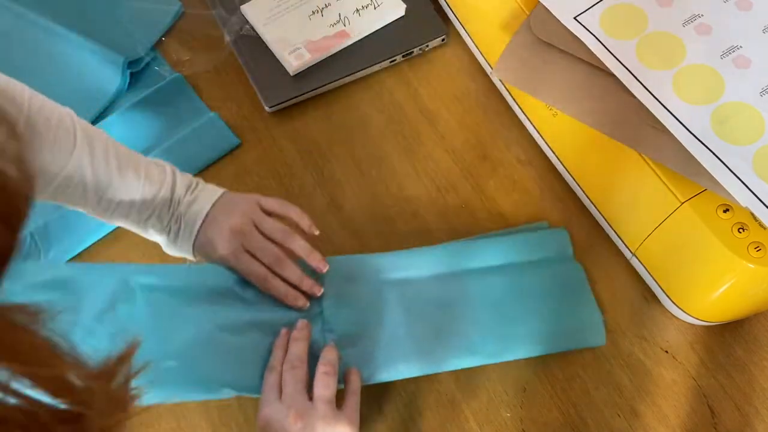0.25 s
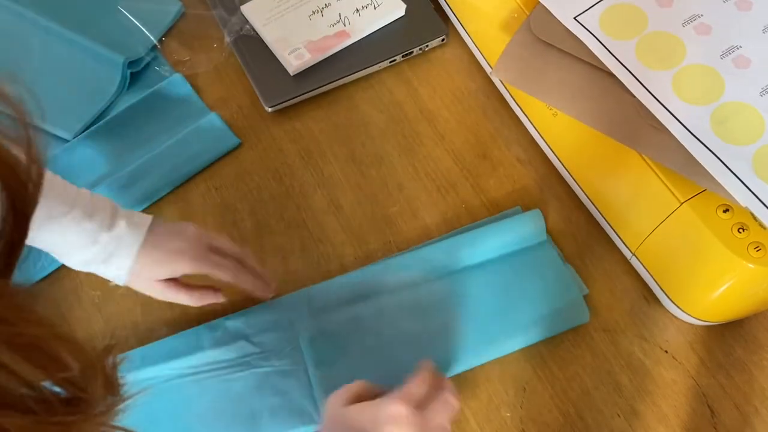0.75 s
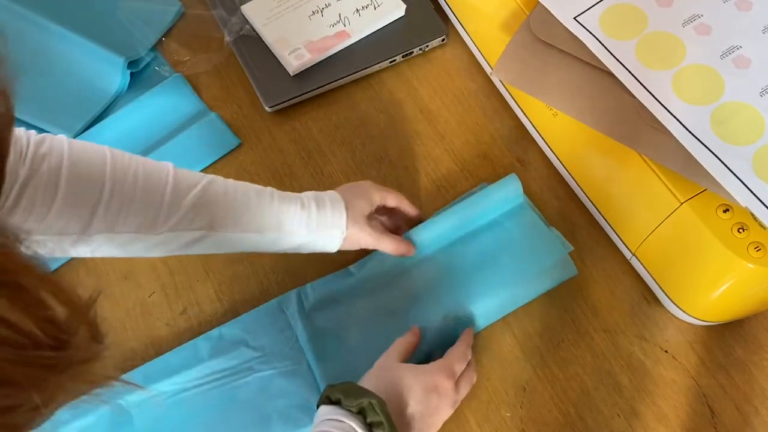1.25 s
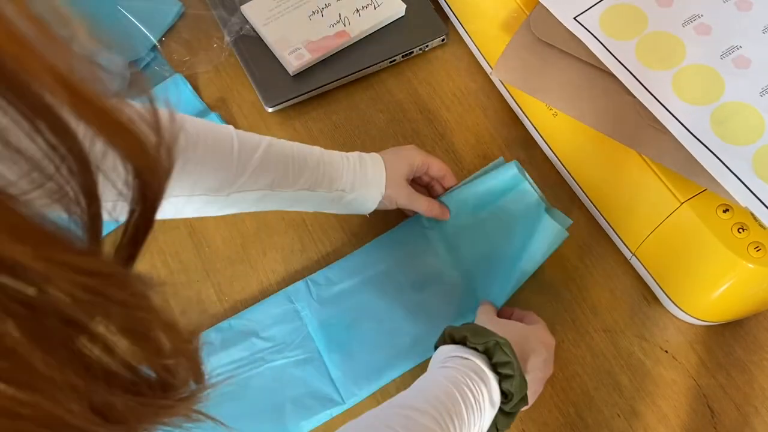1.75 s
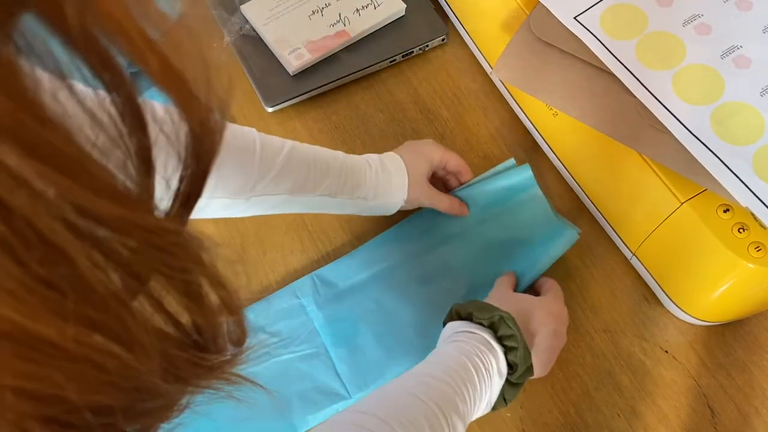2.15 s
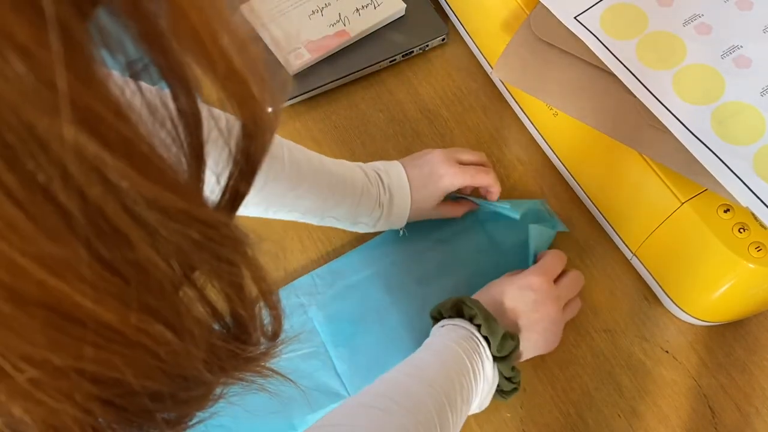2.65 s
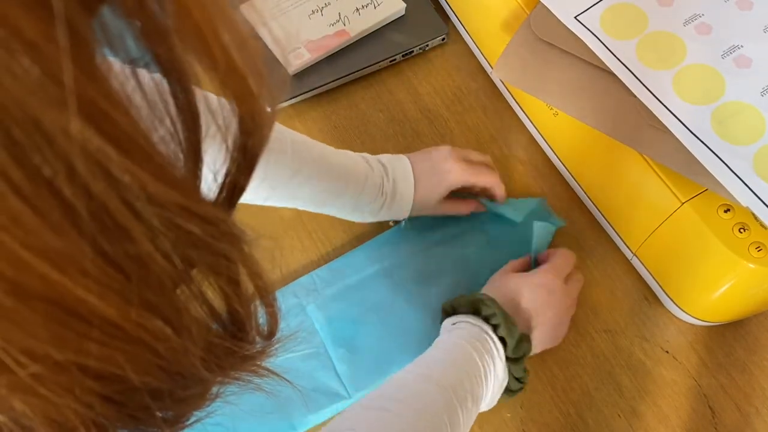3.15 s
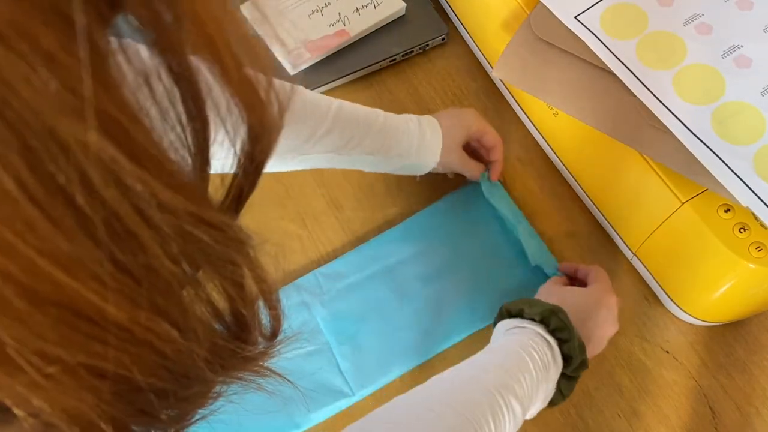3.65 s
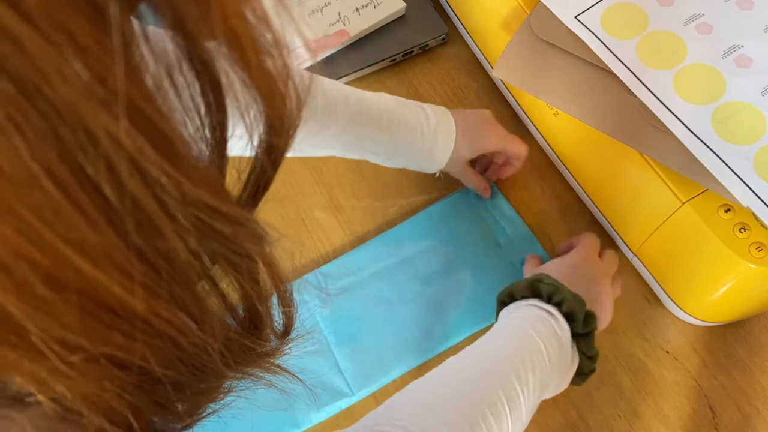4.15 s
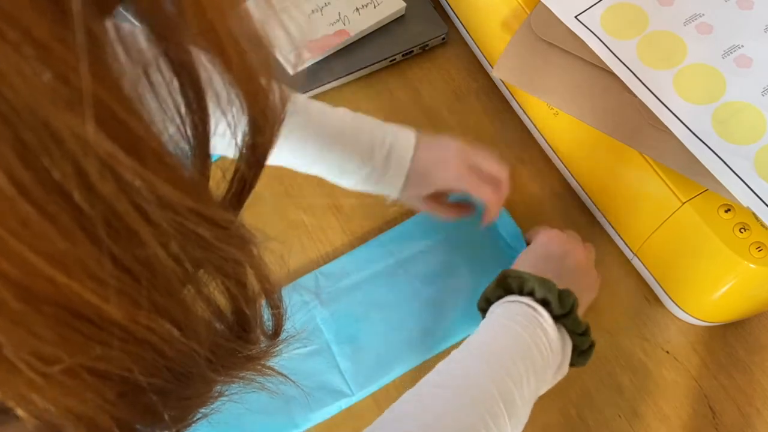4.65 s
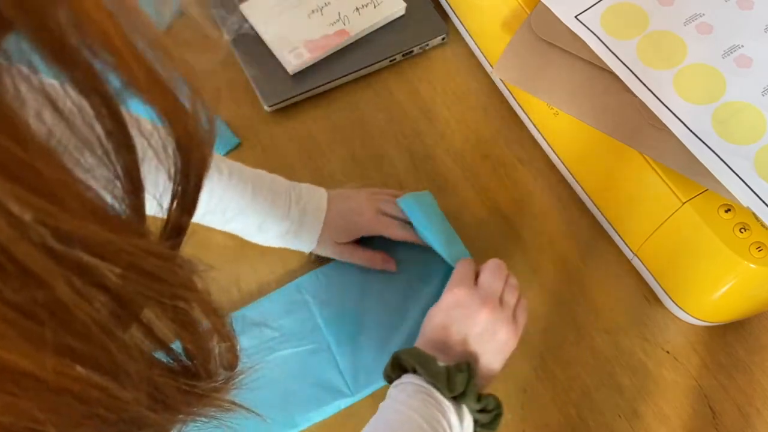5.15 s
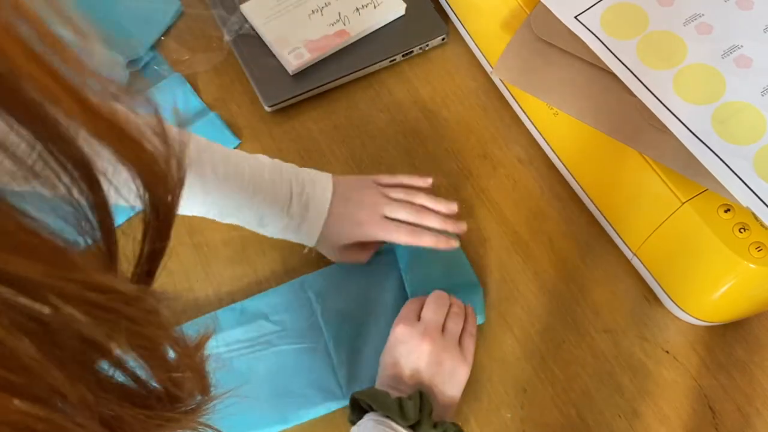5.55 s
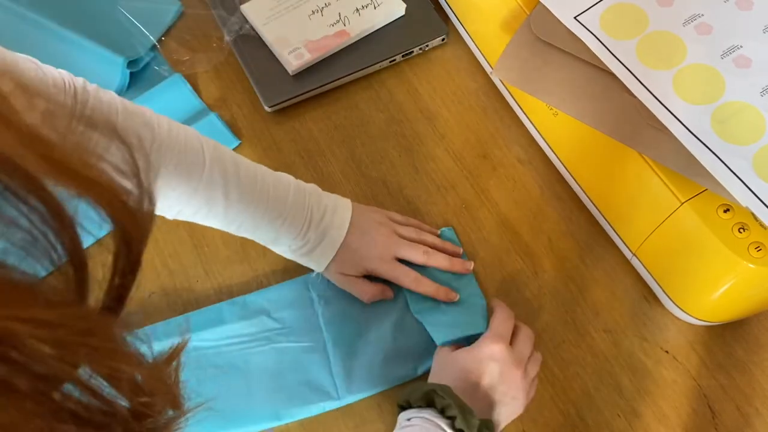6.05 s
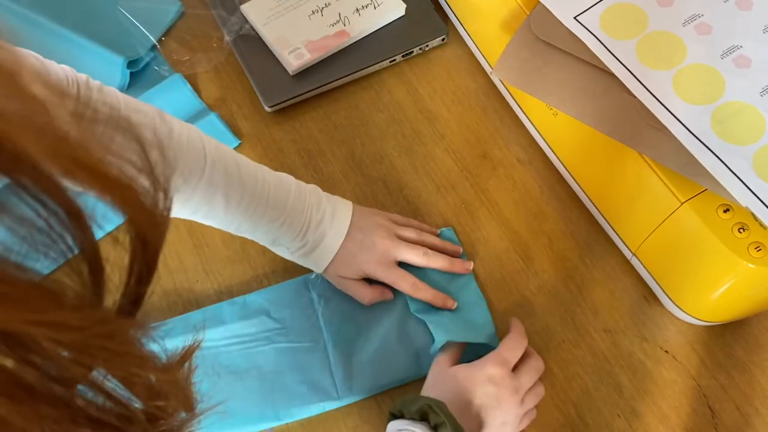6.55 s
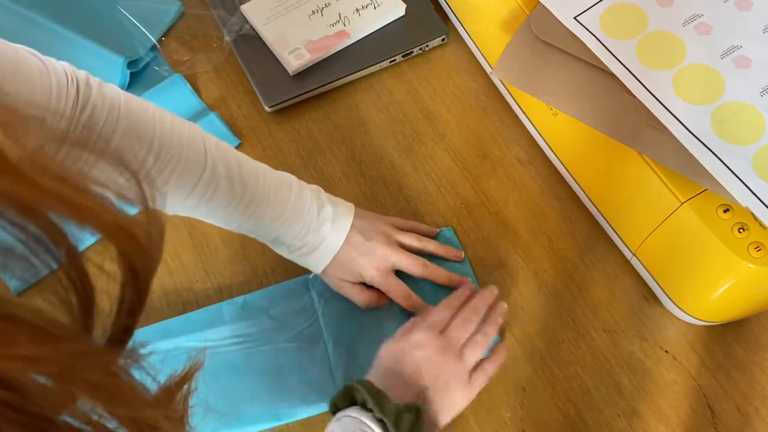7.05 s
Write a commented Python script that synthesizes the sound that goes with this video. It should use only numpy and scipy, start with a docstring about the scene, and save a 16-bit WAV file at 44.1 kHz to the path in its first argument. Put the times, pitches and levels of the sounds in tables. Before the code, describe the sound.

Tissue paper is smoothed and folded by hand on a wooden table, close to the microphone in a small room. It rustles and crackles from the start, and between 0.2 and 0.6 seconds a cluster of low thumps lands on the tabletop, with the rub and rumble of forearms. Uneven bursts of sliding hiss and crinkling follow until about 2.5 seconds, with sharp crease snaps around 1.5. The handling turns lighter, with scattered ticks, a brief lull just before 4 seconds and then a soft bump. Crisp snaps stand out at 4.3 and 4.8 seconds, the second amid stronger rustling and a couple of dull bumps. Gentler, steadier rustling runs from about 5 to 6 seconds, then short crinkly strokes lead to a low thump and a last rustle near 7.1 seconds. A faint, steady low room tone lies underneath.

```python
"""Tissue paper, a long sheet, folded by hand on a wooden table close under a two-port microphone.
The sheet hisses as it slides, crinkles in clumps of tiny buckles and snaps at creases; taut facets ping.
Hands and the bundle land on the table top, whose modes answer with low thumps; shifting forearms and
hands rub and rumble on the wood. A small room adds a short tail and a faint steady tone."""
import sys
import numpy as np
from scipy import signal
from scipy.fft import rfft, irfft
from scipy.io import wavfile

SR = 44100
rng = np.random.default_rng(int(sys.argv[2]) if len(sys.argv) > 2 else 0)


def store_pcm(level_fs):
    """Save levels as 16-bit WAV."""
    pcm = np.round(np.clip(level_fs, -1, 1) * 32767).astype(np.int16)
    wavfile.write(sys.argv[1], SR, np.atleast_2d(pcm).T)


N = 321048
BIN_HZ = np.maximum(np.fft.rfftfreq(N, 1 / SR), 1)

# hand moves on the sheet: t/s, length/s, rustle level/dB, sheet body re rustle/dB
MOVES = [(0.0, 0.04, -47, -2.5), (0.09, 0.063, -45, -4), (0.206, 0.028, -38.5, -3.5), (0.294, 0.2, -44, 4),
         (0.527, 0.042, -41, 1.5), (0.688, 0.0083, -63.5, -7), (0.774, 0.013, -71.5, 13),
         (0.859, 0.064, -45.5, -5), (0.968, 0.031, -37.5, -16), (1.06, 0.13, -54.5, -9),
         (1.117, 0.12, -44, -13.5), (1.302, 0.094, -45, -11), (1.392, 0.12, -41, -13),
         (1.572, 0.18, -46.5, -13.5), (1.79, 0.077, -54, -4.5), (1.873, 0.088, -45.5, -12),
         (1.964, 0.1, -54, -6.5), (2.108, 0.17, -46.5, -11), (2.332, 0.13, -47.5, -6),
         (2.516, .1, -55, -3.5), (2.674, 0.057, -62.5, 1), (2.766, 0.032, -54.5, -2),
         (2.854, 0.033, -51.5, -0.5), (2.961, 0.22, -51, -7.5), (3.202, 0.18, -49.5, -20),
         (3.412, 0.08, -53, -14), (3.525, 0.038, -42.5, -11.5), (3.636, 0.023, -58, 1),
         (3.721, 0.11, -50, -27), (4.026, 0.085, -56.5, -8.5), (4.188, 0.13, -54, -5),
         (4.352, 0.11, -49, -9.5), (4.418, 0.098, -50, -9.5), (4.603, .06, -49.5, -14),
         (4.737, 0.076, -50, -2), (4.788, 0.075, -40, -12), (4.91, 0.14, -49, -11),
         (5.021, 0.076, -45.5, -2.5), (5.142, 0.056, -52, -1), (5.244, 0.29, -49.5, -4),
         (5.538, 0.27, -50, -7.5), (5.866, 0.32, -50, -8.5), (6.104, 0.11, -42.5, -4.5),
         (6.406, 0.025, -44, -6.5), (6.464, 0.041, -51, -14), (6.527, 0.047, -43.5, -5),
         (6.662, 0.11, -41.5, -11), (6.926, 0.029, -54, -19), (7.022, .04, -55.5, -9),
         (7.079, 0.046, -44, -3.5), (7.152, .12, -51, -14)]
# rustle colour: t/s, crisp treble re rustle/dB, favoured f/Hz
RUSTLE_COLOUR = [(0, -1.5, 4400), (.3, -7.5, 2680), (.9, -7, 3580), (1.5, -5.5, 4630), (2.3, -6, 4200),
                 (3.0, -6, 4000), (3.75, -6.5, 6130), (4.6, -5.5, 6400), (5.4, -3.5, 3950),
                 (5.9, -6.5, 4500), (6.15, -5, 3600), (6.4, -10.5, 4480), (6.75, -8, 4460),
                 (7.28, -7, 3570)]
# weight on the table: t/s, rumble level/dB, rub level/dB
LEANING = [(0.0, -57, -53), (0.28, -73, -62), (0.4, -49, -47), (0.55, -39.5, -52.5), (0.93, -58.5, -60.5),
           (1.19, -62.5, -67), (1.36, -51.5, -64), (1.66, -57, -57.5), (1.84, -62, -68.5), (2.08, -61, -60),
           (2.21, -60, -52.5), (2.66, -71, -83), (3.36, -70.5, -79), (4.3, -54.5, -64), (4.7, -64.5, -72),
           (4.91, -53, -65), (5.3, -67, -65), (6.12, -58, -67.5), (7.28, -71, -80)]
# creases snapping: t/s, level/dB, centre f/Hz
SNAPS = [(0.018, -33, 3730), (0.1022, -24, 5300), (0.2143, -24, 2680), (0.2907, -22.5, 2210),
         (0.3515, -21.5, 6690), (0.395, -24, 1690), (0.414, -19.5, 1540), (0.462, -19, 1770),
         (0.5475, -16.5, 4520), (0.829, -31, 3740), (0.8428, -22, 3900), (0.8674, -22.5, 2750),
         (1.0465, -24.5, 4570), (1.3047, -26, 7420), (1.4112, -20.5, 7010), (1.4681, -16.5, 4430),
         (1.5469, -18, 6990), (1.5869, -22.5, 11000), (1.876, -24.5, 6500), (2.1116, -25, 4730),
         (2.175, -23, 6720), (2.5376, -29, 10900), (2.6804, -28.5, 6060), (2.883, -35, 5550),
         (3.1439, -28, 3450), (3.361, -25.5, 3760), (3.4999, -31, 7320), (3.5124, -26.5, 4340),
         (3.6378, -29.5, 2820), (3.741, -26, 7280), (3.7663, -23.5, 5900), (3.7994, -26.5, 5650),
         (3.916, -43, 6490), (3.9578, -39, 7270), (4.0055, -27.5, 4860), (4.0466, -30.5, 6600),
         (4.2011, -25.5, 7350), (4.289, -16.5, 7000), (4.7159, -22.5, 4920), (4.753, -23, 7280),
         (4.783, -14, 6660), (4.863, -23, 4090), (4.9035, -26.5, 6100), (5.2628, -25, 5200),
         (5.4103, -35, 3370), (5.8457, -29, 6870), (6.038, -26.5, 7350), (6.1363, -23, 4150),
         (6.3834, -27, 4090), (6.4006, -21, 3780), (6.6732, -27, 4440), (6.7503, -23, 4450),
         (6.7725, -41, 5010), (6.923, -32, 3450), (7.0544, -25, 4580), (7.0805, -22, 2710)]
# table contacts: t/s, level/dB, offsets/dB for modes at 105-200 Hz, 200-720 Hz, above 720 Hz
THUMPS = [(0.233, -21.5, -3, -6.5, 2.5), (0.26, -33, 6, -7, -19), (0.29, -19.5, -9.5, -11, -4),
          (0.323, -26.5, -33, -6.5, 2), (0.354, -17.5, -10, -16.5, -12), (0.403, -22, -19, -35, -32),
          (0.469, -32.5, 0, -2, -4), (0.487, -39, -2, 5, -38), (0.524, -34.5, 3.5, 4, -14),
          (0.553, -17.5, -5.5, 0, -4), (0.567, -26, -5, 2.5, -21), (0.59, -28, -6, 1.5, -23),
          (0.768, -42, -14, -8, -10), (0.794, -43, -2, -7, -12), (1.141, -45.5, -0.5, -13, -11),
          (1.327, -44, 0.5, -14, -16), (1.399, -40.5, -4, -17, -10), (1.67, -50, -4, -2, -4),
          (3.531, -50.5, 2, -5.5, 10.5), (3.799, -45.5, -1, -7, -26), (4.008, -27.5, -6, -13, -14.5),
          (4.2, -47, -9, 2.5, -4), (4.278, -39.5, -20, -13, -13), (4.406, -48, 7, -1.5, 4),
          (4.72, -29, -10.5, -23, -23), (4.784, -36, -5, -7.5, -8), (4.866, -28.5, -12, -13, -12),
          (5.462, -45, -2.5, -25, 2), (5.519, -35.5, -13, -28, -27), (5.689, -43.5, -8, -26, -19),
          (5.953, -57.5, 7, 3, -4), (6.372, -56, -3, 5.5, -1), (6.773, -38.5, -7.5, -20, -16),
          (7.092, -23.5, -14.5, -16.5, -30), (7.195, -43, -11, -17, -22), (7.254, -38.5, -9, -17, -16)]
# table-top modes: f/Hz, level/dB, t60/s
TABLE_MODES = [(68.8, -2.5, 0.44), (85.1, 3, 0.12), (124.2, 7, 0.29), (177.3, -3.5, 0.16),
               (261.5, 5, 0.083), (334, -0.5, 0.21), (413, -1.5, 0.13), (492, -3, 0.082), (586, -3, 0.068),
               (722, -7, 0.083), (819, -4, 0.1), (976, -2.5, 0.078), (1116, -10.5, 0.062), (1400, -4, 0.04),
               (1950, -11, 0.02)]
# noise spectra of paper, wood and room: f/Hz, level/dB
RUSTLE_SPECTRUM = [(700, -24), (1400, -6), (2200, -1), (3200, 0.5), (5000, 0), (6500, -2), (8000, -0.5),
                   (11000, -31.5)]
BODY_SPECTRUM = [(500, -1), (800, -4.5), (1100, 1), (1600, -3.5), (2400, -10.5), (4000, -57)]
CRISP_SPECTRUM = [(4500, -11), (7000, -8), (8500, -5.5), (11000, -3.5), (13500, -5), (16000, -6.5)]
RUB_SPECTRUM = [(130, -14), (250, 5), (420, 2.5), (600, 0.5), (900, -52.5)]
RUMBLE_SPECTRUM = [(25, -10.5), (48, -4), (66, -2), (92, -3), (124, -1.5), (160, -11), (260, -7),
                   (500, -73)]
ROOM_SPECTRUM = [(30, 13), (60, 21.5), (130, -1.5), (300, 6), (1000, -1), (4000, -85.5), (16000, -51)]
# left-right coherence of the sound field: f/Hz, coherence/0-1
COHERENCE = [(60, 0.99), (200, 0.92), (400, 0.8), (750, .15), (1100, 0.5), (1500, 0.26), (2000, 0.5),
             (2800, 0.86), (4200, 0.87), (5500, 0.4), (6800, 1), (8000, 1)]
# port imbalance: f/Hz, left minus right/dB
PORT_BALANCE = [(70, 0.5), (130, -3), (220, 2), (1500, 0), (2200, 3), (4000, 0.5), (5300, 4.5), (6800, 0)]


def from_db(db):
    """dB to gain."""
    return 10 ** (np.asarray(db) / 20)


def unit_rms(x):
    """Scale to rms 1."""
    return x / np.sqrt(np.mean(x ** 2) + 1e-20)


def in_time(rows):
    """Curve columns at every sample."""
    times_s, *columns = np.transpose(rows)
    return [np.interp(np.arange(N) / SR, times_s, column) for column in columns]


def at_hz(points, hz):
    """Interpolate over log frequency."""
    points_hz, values = np.transpose(points)
    return np.interp(np.log(hz), np.log(points_hz), values)


def drift(rate_hz):
    """Slow random wander, rms 1."""
    r = np.exp(-2 * np.pi * rate_hz / SR)
    return unit_rms(signal.lfilter([1], [1, -2 * r, r * r], rng.standard_normal(N + SR))[SR:])


def field(pair, spectrum):
    """Two independent signals to coloured left and right with the field's coherence."""
    mid, side = rfft(pair) * from_db(at_hz(spectrum, BIN_HZ))
    coherence = at_hz(COHERENCE, BIN_HZ)
    return irfft(np.sqrt(1 + coherence) * mid + np.sqrt(1 - coherence) * side * [[1], [-1]], N)


def ring(clicks, hz, t60_s):
    """One mode: each click starts a decaying sine."""
    r, w = from_db(-60 / (t60_s * SR)), 2 * np.pi * hz / SR
    return signal.lfilter([0, np.sin(w)], [1, -2 * r * np.cos(w), r * r], clicks)


def hand_moves(rise_db_per_s=442, sag_db_per_s=1.5, fall_db_per_s=285, rest_db=-79):
    """Rustle and body curves, dB: moves rise, sag, die away and add in power over the settling sheet."""
    t = np.arange(0, N + 64, 64) / SR
    start_s, length_s, level_db, body_db = np.transpose(MOVES)[:, :, None]
    age_s = t - start_s
    db = level_db + rise_db_per_s * np.minimum(age_s, 0)
    db -= sag_db_per_s * np.clip(age_s, 0, length_s)
    db -= fall_db_per_s * np.maximum(age_s - length_s, 0)
    power = from_db(2 * np.maximum(db, -200))
    total = power.sum(axis=0) + from_db(2 * rest_db)
    mean_body_db = (power * body_db).sum(axis=0) / total
    return in_time(np.transpose([t, 10 * np.log10(total), mean_body_db]))


def crinkle(per_s, spread_db, decay_s, clump_db, slide):
    """Envelope of uneven buckles in random clumps, over steady sliding."""
    sizes = from_db(spread_db * np.minimum(rng.exponential(1, N), 4))
    buckles = rng.random(N) < per_s * from_db(clump_db * drift(30)) / SR
    r = np.exp(-1 / (decay_s * SR))
    decay_and_rise = np.convolve([1, -r], [1, -r ** 12])
    return slide + unit_rms(signal.lfilter([1], decay_and_rise, sizes * buckles + 1e-18))


def finger_span(pair, centre_hz, lift_db=3, width_oct=0.69, waver_db=1.97, waver_hz=11.6):
    """The span under the fingers favours one region; third-octave bands also waver independently."""
    spectrum, out = rfft(pair), 0
    for hz in 700 * 2 ** np.arange(0, 3.7, 1 / 3):
        band = np.cos(np.pi / 2 * np.clip(3 * np.log2(BIN_HZ / hz), -1, 1)) ** 2
        nearness = np.exp(-(np.log2(hz / centre_hz) / width_oct) ** 2)
        out += from_db(lift_db * nearness + waver_db * drift(waver_hz)) * irfft(spectrum * band, N)
    return out


def facet_pings(per_s=220, t60_cycles=22):
    """Small taut facets pop at random and ring briefly, each at its own pitch."""
    sizes = from_db(2.52 * np.minimum(rng.exponential(1, N), 2.5))
    pops = sizes * (rng.random(N) < per_s / SR)
    facet = rng.integers(0, 16, N)
    clicks = pops * rng.standard_normal((2, N))
    rings = sum(ring(clicks * (facet == k) + 1e-18, hz, t60_cycles / hz)
                for k, hz in enumerate(np.geomspace(1400, 9000, 16)))
    return unit_rms(field(rings, [(1400, -10.5), (3500, -2.5), (9000, 2.5)]))


def paper(rub_db):
    """Shared buckles drive rustle, sheet body and crisp treble; slower ones feed body and rub on wood."""
    rustle_db, body_db = hand_moves()
    crisp_db, centre_hz = in_time(RUSTLE_COLOUR)
    grain = crinkle(per_s=400, spread_db=2, decay_s=0.0056, clump_db=3.5, slide=0.99)
    ticks = crinkle(per_s=21, spread_db=-1.5, decay_s=0.00027, clump_db=-2, slide=0)
    soft = crinkle(per_s=190, spread_db=-3, decay_s=0.0089, clump_db=5, slide=0.51)
    white = rng.standard_normal((2, 2, N))
    rustle = unit_rms(field((grain + 0.13 * ticks) * white[0], RUSTLE_SPECTRUM))
    body = unit_rms(field((0.86 * grain + soft) * white[1], BODY_SPECTRUM))
    crisp = unit_rms(field((grain + 0.78 * ticks) * white[1], CRISP_SPECTRUM))
    rub = unit_rms(field(soft * white[0], RUB_SPECTRUM))
    sheet = finger_span(rustle + from_db(body_db + 0.63) * body, centre_hz)
    sheet += from_db(crisp_db + 9.5) * crisp
    sheet += from_db(-6) * facet_pings()
    return from_db(rustle_db - 3) * sheet + from_db(rub_db) * rub


def table_rumble(level_db):
    """Forearms and hands shift on the wood: low noise."""
    return from_db(level_db) * unit_rms(field(rng.standard_normal((2, N)), RUMBLE_SPECTRUM))


def room_tone(level_db):
    """Steady low background noise."""
    return from_db(level_db) * unit_rms(field(rng.standard_normal((2, N)), ROOM_SPECTRUM))


def crease_snaps(samples=900, rise_s=0.00048, tick_s=0.00037):
    """A crease lets go: sharp broadband tick, short noisy tail, one broad resonance."""
    out, t = np.zeros((2, N)), np.arange(samples) / SR
    noises = rng.standard_normal((len(SNAPS), 2, samples))
    tails_s = 0.0065 + 0.0067 * rng.random(len(SNAPS))
    for (start_s, level_db, hz), noise, tail_s in zip(SNAPS, noises, tails_s):
        decay = np.exp(-t / tick_s) + 0.37 * np.exp(-t / tail_s)
        burst = noise * np.minimum(t / rise_s, 1) * decay
        b, a = signal.iirpeak(hz, Q=1.2, fs=SR)
        burst = signal.lfilter(b, a, burst) + 0.62 * burst
        burst *= from_db(level_db) / np.abs(burst[0]).max()
        i = round(start_s * SR)
        out[:, i:i + samples] += burst[:, :N - i]
    return field(out, [(300, -7.5), (1500, -12), (7000, -5), (16000, -7)])


def table_thumps(touches=4, contact_s=0.01172, touch_loss_db=5.5, group_tops_hz=(105, 200, 720)):
    """A landing is several touches striking all modes; place and force set each mode group's share."""
    start_s, level_db, *offsets_db = np.transpose(THUMPS)
    group_db = [0] + offsets_db
    out = np.zeros((2, N))
    scatter = rng.standard_normal((len(THUMPS), 2 * len(TABLE_MODES)))
    delay_s = contact_s * np.sort(rng.random((len(THUMPS), touches)), axis=1)
    touch_samples = np.round((start_s[:, None] + delay_s - delay_s[:, :1]) * SR).astype(int).T
    weights = from_db(-touch_loss_db * np.arange(touches))
    weights /= np.linalg.norm(weights)
    for k, (hz, mode_db, t60_s) in enumerate(TABLE_MODES):
        share_db = group_db[np.searchsorted(group_tops_hz, hz)]
        strength = (-1) ** k * from_db(level_db + share_db + mode_db - 4 + 1.6 * scatter[:, 2 * k])
        pan = 0.85 * np.sqrt(1 - at_hz(COHERENCE, hz)) * scatter[:, 2 * k + 1]
        clicks = np.full((2, N), 1e-18)
        for at, weight in zip(touch_samples, weights):
            clicks[:, at] += weight * strength * np.array([1 + pan, 1 - pan])
        # a padded hand builds the mode up over about a cycle
        out += ring(clicks, hz, t60_s) - ring(clicks, hz, 2.3 / hz)
    return out


def room(direct, t60_s, wet_db):
    """Direct sound plus a short, duller diffuse tail, independent per side."""
    t = np.arange(int(0.4 * SR)) / SR
    tail = rng.standard_normal((2, len(t))) * from_db(-60 * t / t60_s) * (t > 0.004)
    tail = signal.lfilter([0.35], [1, -0.65], tail)
    tail /= np.linalg.norm(tail, axis=1, keepdims=True)
    return direct + from_db(wet_db) * signal.fftconvolve(direct, tail, axes=1)[:, :N]


def scene():
    """Paper and creases in a small room, over table and room tone."""
    rumble_db, rub_db = in_time(LEANING)
    sheet = paper(rub_db) + crease_snaps()
    tone = room_tone(level_db=-72)
    return room(sheet, t60_s=0.044, wet_db=-12.5) + table_thumps() + table_rumble(rumble_db) + tone


def record(dry, lead_from_hz=6880, hz_per_cycle=4200, bass_cut_hz=50, top_cut_hz=15950):
    """Two ports of unequal colour, the right leading in the treble; deep bass and top are cut."""
    half_lead_rad = np.pi * np.maximum(BIN_HZ - lead_from_hz, 0) / hz_per_cycle
    left_port = from_db(at_hz(PORT_BALANCE, BIN_HZ) / 2) * np.exp(-1j * half_lead_rad)
    heard = irfft(rfft(dry) * [left_port, 1 / left_port], N)
    heard = signal.sosfilt(signal.butter(2, bass_cut_hz, "high", fs=SR, output="sos"), heard)
    return signal.sosfilt(signal.cheby2(16, 45, top_cut_hz, fs=SR, output="sos"), heard)


dry = scene()
out = record(dry)
store_pcm(out)
```